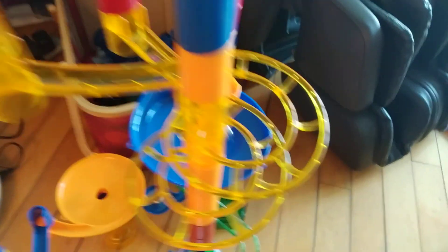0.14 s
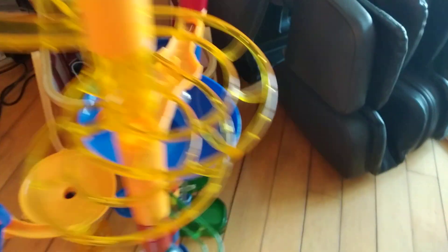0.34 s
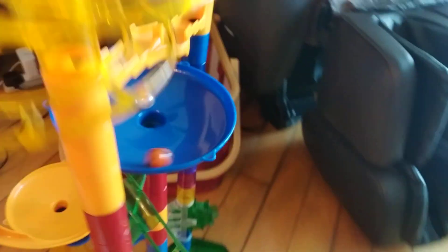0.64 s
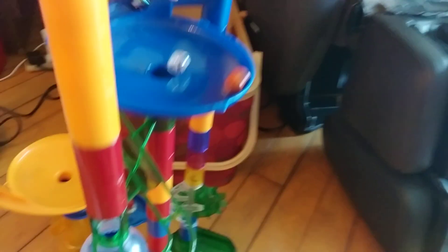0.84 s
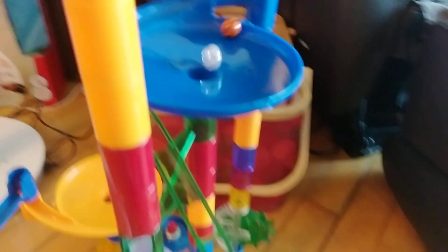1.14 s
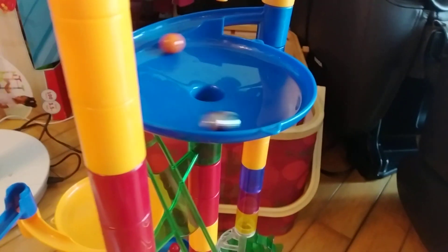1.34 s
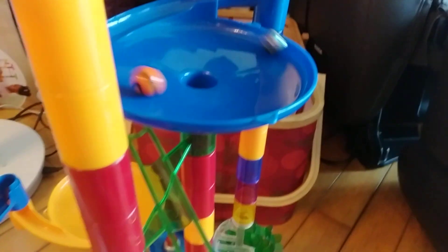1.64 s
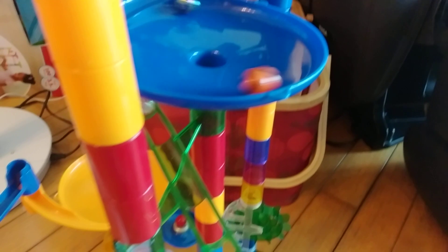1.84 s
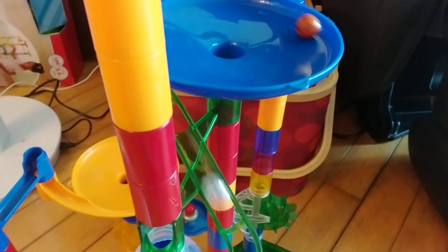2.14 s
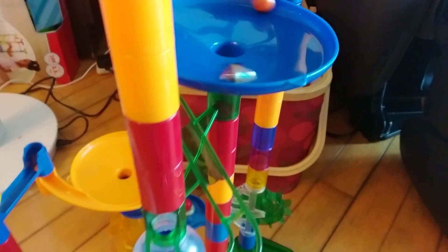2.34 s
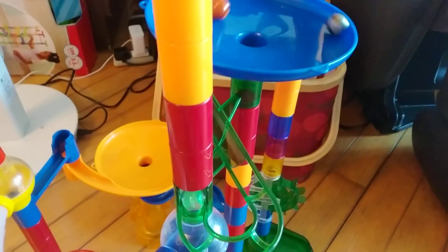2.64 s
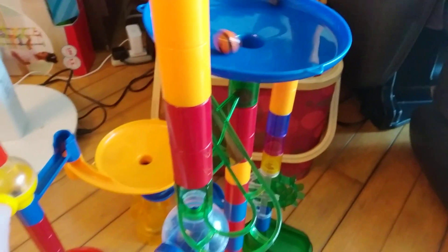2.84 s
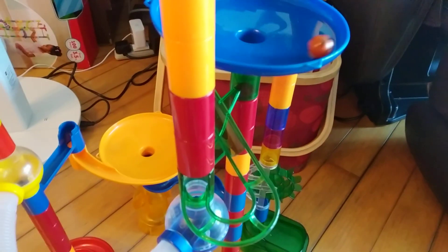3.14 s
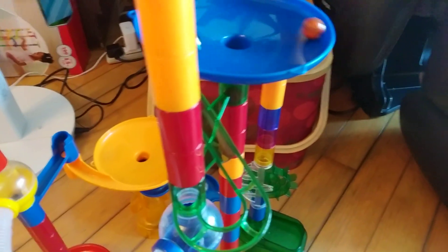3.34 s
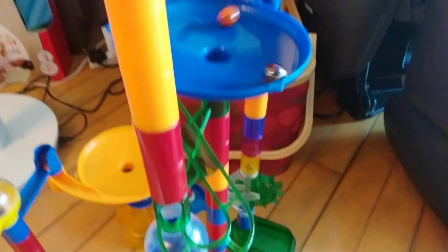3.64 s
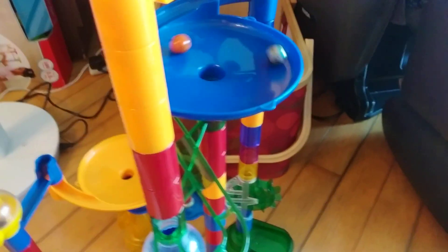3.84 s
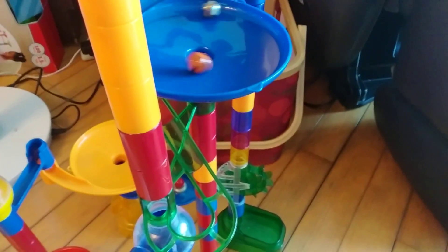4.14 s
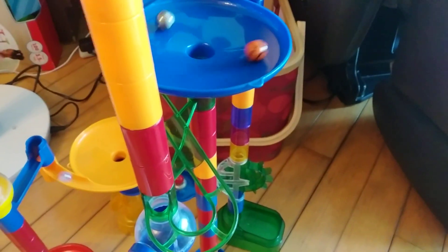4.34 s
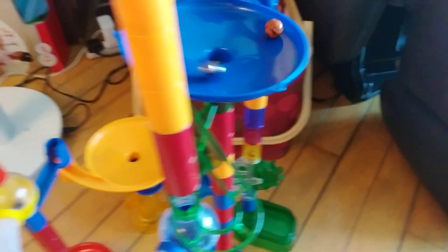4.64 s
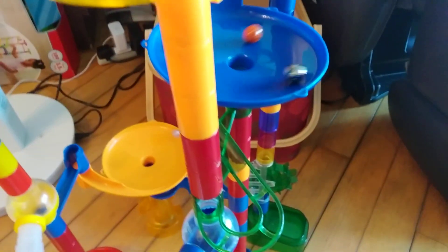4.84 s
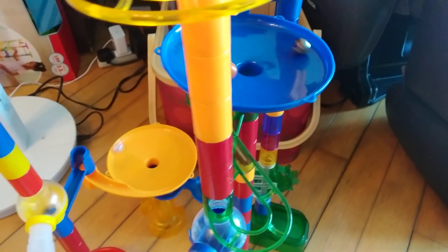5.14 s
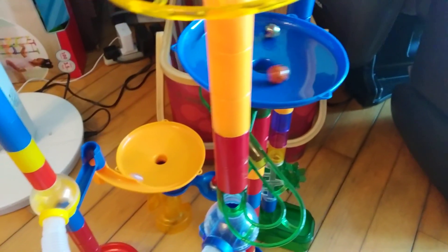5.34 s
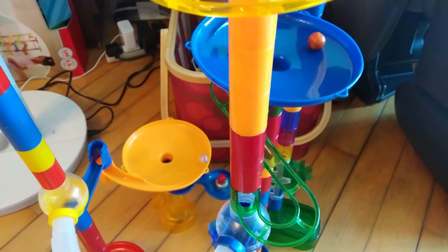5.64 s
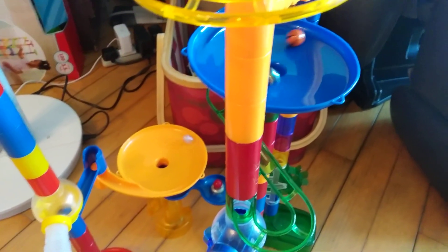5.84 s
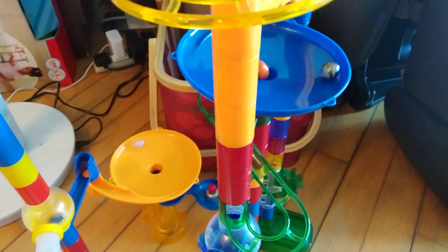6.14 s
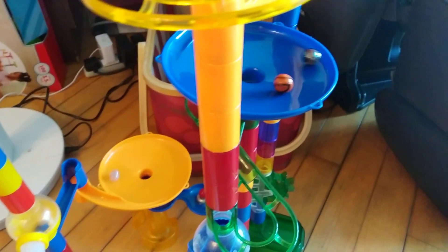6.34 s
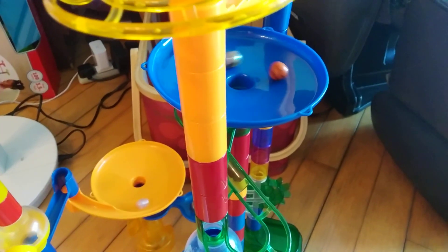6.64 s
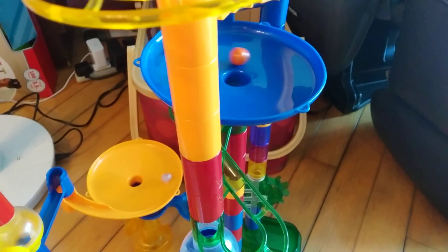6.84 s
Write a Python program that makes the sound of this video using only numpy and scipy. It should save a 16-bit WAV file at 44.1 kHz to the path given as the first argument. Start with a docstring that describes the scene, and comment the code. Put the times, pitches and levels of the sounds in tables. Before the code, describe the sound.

Glass marbles on a plastic track, heard close in a small, slightly live room. From 0 to 0.65 s hard clacks crowd together over rattling tubes. After a brief lull, a marble drops onto a thin rail at 0.9 s, which sings high and rough until about 1.2 s. A tight burst of bright clacks follows at 1.25-1.5 s, then sparse softer knocks to 2 s while marbles roll round the funnels. Flurries of clicks and hollow chute rattle come at 2.3, 2.8 and 3.2-3.5 s. From 3.64 to 4.7 s they grow almost continuous, with a light flap ringing clearly around 3.65 and 4.35-4.45 s. Then the clatter stops: a soft, grainy, wavering roll slowly fades, with faint ticks near 5.05 and 5.7 s, a small cluster of wall bumps at 6.2 s and tiny ticks at 6.8 s, over quiet air and faint low hum.

```python
"""Glass marbles on a plastic track

Glass marbles run through a plastic marble track in a small room, heard by a phone close by.
Blows burst and ring as they clack down joints, strike a light flap and set a thin rail singing.
Rolling is made of crowds of tiny noise bursts: rattling in tubes and chutes, soft round the funnels.
In the end the soft roll is left, with a few faint ticks, over still air and a low mains hum."""
import sys
import numpy as np
from scipy import signal
from scipy.fft import rfft, irfft, next_fast_len
from scipy.io import wavfile
from scipy.ndimage import uniform_filter1d, map_coordinates

SR = 44100
rng = np.random.default_rng(int(sys.argv[2]) if len(sys.argv) > 2 else 0)


def to_wav(s):
    """Save 16-bit WAV."""
    ch = np.atleast_2d(s).T  # columns
    pcm = np.round(np.clip(ch, -1, 1) * 32767)  # PCM
    wavfile.write(sys.argv[1], SR, pcm.astype(np.int16))


N = 308700

# colour of struck plastic: (f/Hz, level/dB)
PLASTIC = [(100, -26), (300, -22), (650, -2.5), (1000, -4), (1500, -4), (2400, 2.5), (3700, -1.5),
           (4700, 3.5), (7300, 1.5), (8300, -10), (10500, -20.5), (16000, -30.5)]
# balance of the towers: (f/Hz, left over right/dB)
TOWER_SIDE = [(100, 3.5), (700, -7), (1300, -6), (2400, 3), (4400, 0.5), (8000, -5.5)]

TOP_HZ = 16300  # nothing is kept above this
TIME = np.arange(N) / SR
AFTER = np.arange(SR // 7) / SR  # seconds since a blow


def amp(db):
    """Turn decibels into a gain."""
    return 10 ** (np.asarray(db) / 20)


def unit(x):
    """Scale to an rms of 1."""
    return x / np.sqrt(np.mean(x ** 2) + 1e-20)


def unit_blow(x, count=400):
    """Scale so that the first samples have an rms of 1."""
    return x / np.sqrt(np.mean(x[..., :count] ** 2) + 1e-20)


def along(points, hz):
    """Read a curve of (f/Hz, value) points at any frequency, on a log axis."""
    f, value = np.transpose(points)
    return np.interp(np.log(hz + 1), np.log(f + 1), value)


def level(rows):
    """Gain at every sample for each dB column that follows the time column."""
    s, *columns = np.transpose(rows)
    return np.array([amp(np.interp(TIME, s, db)) for db in columns])


def wobble(rate):
    """A smooth random curve through `rate` random points a second."""
    knots = rng.standard_normal(int(N * rate / SR) + 4)
    return map_coordinates(knots, [TIME * rate])


def sides(db):
    """Left and right gains that differ by so many dB."""
    pair = amp(np.array([[.5], [-.5]]) * db)
    return pair / np.sqrt(np.mean(pair ** 2, axis=0))


def filtered(x, response):
    """Multiply the spectrum of x by a response of frequency."""
    n = x.shape[-1]
    m = next_fast_len(n + 2048)
    return irfft(rfft(x, m) * response(np.fft.rfftfreq(m, 1 / SR)), m)[..., :n]


def coloured(pair, colour, side):
    """Colour two unrelated signals and spread them over two microphones: alike in the bass, left late."""
    # (f/Hz, likeness of the two microphones from 0 to 1)
    alike = [(100, 0.98), (640, 1), (1400, 1), (3000, 0.31), (7000, 0.018)]
    lag = .00018  # seconds by which the right microphone hears the sound first

    def spread(hz):
        turn = np.arccos(np.clip(along(alike, hz), -1, 1)) / 2
        return amp(colour(hz)) * [np.cos(turn), np.sin(turn)]

    def microphones(hz):
        delay = np.exp(np.pi * 1j * hz * lag * np.array([[-1], [1]]))
        return sides(along(side, hz)) * delay

    mid, diff = filtered(pair, spread)
    return unit(filtered(np.array([mid + diff, mid - diff]), microphones))


def ring(modes, attack):
    """One blow on (f/Hz, width/Hz, level/dB) modes; wider ones die faster, phase and level vary by side."""
    out = 0
    for hz, width, db in modes:
        phase = rng.uniform(0, 2 * np.pi) + rng.normal(0, 1.28, (2, 1))
        gain = amp(db + rng.normal(0, 0.24, (2, 1)))
        out = out + gain * np.sin(2 * np.pi * hz * AFTER + phase) * np.exp(-np.pi * width * AFTER)
    return unit_blow(out * (1 - np.exp(-AFTER / attack)))


def crack(colour, t60, tail_db, tail_t60, count=60):
    """The crowded modes of thin plastic: a fast burst, then the weaker, duller shiver of the joined parts."""
    # each point of contact favours other groups of modes
    groups_db = 3.2 * rng.standard_normal(count)

    def spot(hz):
        return np.interp(hz, np.linspace(0, TOP_HZ, count), groups_db) * np.clip(hz / 2500, 0, 1)

    noise = coloured(rng.standard_normal((2, len(AFTER))), lambda hz: colour(hz) + spot(hz), TOWER_SIDE)
    dull = [(3000, 11.0), (7000, -7.5), (10000, -16.0)]
    shiver = filtered(noise, lambda hz: amp(along(dull, hz)))
    sound = noise * amp(-60 * AFTER / t60) + shiver * amp(tail_db - 60 * AFTER / tail_t60)
    return unit_blow(sound * (1 - np.exp(-(AFTER / 0.001) ** 2)))


def snap(hz, upper_hz, upper_db):
    """The first swing of a struck wall: a few cycles, over in a few milliseconds."""
    crest_s, half_length_s = 0.00139, 0.00057
    t = AFTER - crest_s
    lead = np.array([[.6], [-.6]])  # radians, left first
    swing = np.cos(2 * np.pi * hz * t + lead) + amp(upper_db) * np.cos(2 * np.pi * upper_hz * t + lead)
    return swing / np.hypot(1, amp(upper_db)) * np.exp(-(t / half_length_s) ** 2)


def add(track, s, sound):
    """Mix a sound in at time s."""
    start = max(round(s * SR), 0)
    track[:, start:start + sound.shape[1]] += sound[:, :N - start]


def chatter(rate, spread_db, t60):
    """Tiny contacts of a rolling marble at random times, `rate` a second, each a noise burst that fades."""
    strength = amp(spread_db * np.clip(rng.standard_normal(N), -2, 2))
    contacts = (rng.random(N) < rate / SR) * strength
    power = signal.fftconvolve(contacts ** 2, amp(-120 * AFTER / t60))[:N]
    return unit(np.sqrt(np.abs(power)) * rng.standard_normal((2, N)))


def resonances(modes, hz):
    """Response of (f/Hz, width/Hz, level/dB) modes, which ring only after they are driven."""
    total = 0
    for k, (centre, width, db) in enumerate(modes):
        damping = 1j * hz * width
        total = total + (-1) ** k * amp(db) * damping / (centre * centre - hz * hz + damping)
    return total


def stay(start, length, attack, fade_db_per_s):
    """Loudness curve of a marble's stay on a part: it rises, holds, then dies away."""
    since = TIME - start
    return np.clip(since / attack, 0, 1) * amp(-np.clip(fade_db_per_s * (since - length), 0, 200))


def wall_ring(hz, width_hz, waver, size):
    """A resonance stirred by a rolling marble; its pitch wanders with the point of contact."""
    stir = rng.standard_normal((3, size)) + 1j * rng.standard_normal((3, size))
    # the third noise is shared by both sides
    stir = signal.lfilter(*signal.butter(2, width_hz / SR), stir[:2] + 1.44 * stir[2])
    pitch = hz * (1 + waver * wobble(12)[:size])
    return unit(np.real(stir * np.exp(2j * np.pi * np.cumsum(pitch) / SR)))


def background():
    """Still air as coloured noise, and the hum of an appliance as gently wavering sines."""
    # colour of the quiet room: (f/Hz, level/dB)
    air_colour = [(25, -22), (65, -30), (100, -1.5), (140, -5.5), (300, -6.5), (700, -5.5), (2000, -34),
                  (7000, -16.5), (9000, -42.5), (16000, -54)]
    # mains hum before its final gain: (f/Hz, level/dB)
    hum_tones = [(100.4, -68), (200.1, -73)]
    air = coloured(rng.standard_normal((2, N)), lambda hz: along(air_colour, hz), [(100, 3.1), (2000, 1)])
    hum = 0
    for hz, db in hum_tones:
        loudness = amp(db + 3 * wobble(9)) * np.sqrt(2)
        hum = hum + loudness * np.sin(2 * np.pi * hz * TIME + .5 * wobble(9))
    return amp(-63.0) * air + amp(3.0) * sides(4.9) * hum


def room(x, count=4):
    """Echoes as fading noise: random tails take turns every 2048 samples, so the echoes keep varying."""
    # time to die by 60 dB: (f/Hz, t60/s)
    decay = [(200, 1), (1500, 0.072), (6000, 0.24), (12000, 0.09)]
    out = np.zeros((2, N))
    turn = (np.arange(N) // 2048) % count
    for k in range(count):
        hz, t, z = signal.stft(rng.standard_normal((2, SR // 2)), SR, nperseg=256)
        fade = amp(-60 * t / along(decay, hz)[:, None])
        tail = signal.istft(z * fade, SR, nperseg=256)[1]
        tail *= 1 - np.exp(-(np.arange(tail.shape[1]) / SR / 0.0028) ** 2)
        share = uniform_filter1d(1.0 * (turn == k), size=128)
        out += signal.fftconvolve(x * share, tail / np.linalg.norm(tail[0]), axes=1)[:, :N]
    return out


def thumps():
    """A heavy landing shoves a whole tower: a low sine that dies within a few cycles."""
    # dull thumps: (t/s, level/dB, f/Hz)
    landings = [(1.1784, -39.5, 285), (1.186, -44, 129), (1.357, -35.5, 420), (3.379, -56, 163),
                (4.198, -48, 526)]
    out = np.zeros((2, N))
    for s, db, hz in landings:
        shove = np.sin(2 * np.pi * hz * AFTER) * np.exp(-.9 * hz * AFTER)
        add(out, s, amp(db) * sides(3.5) * unit_blow(shove))
    return out


def funnels():
    """Marbles circle with a soft grainy roll and a wavering drone, tick over flaws and bump the wall."""
    # colour of the rolling: (f/Hz, level/dB)
    roll_colour = [(59, -40), (100, -7), (126, -14), (189, -8), (234, -33), (328, -2.5), (365, -22),
                   (558, 1), (991, -9), (1420, 1.5), (1910, -6.5), (2270, 1.5), (3780, -22), (7140, -19),
                   (16000, -126.5)]
    # balance: (f/Hz, left over right/dB)
    balance = [(100, 4.6), (700, 0.69), (1300, 1.1), (2400, 13.8), (4400, 4.9), (8000, 1)]
    # strength of the rolling, mostly sinking as the marbles slow down: (t/s, level/dB)
    strength = [(0, -39.5), (1.7, -43.5), (2.1, -47), (3.1, -50), (4.85, -45), (5.3, -48.5), (5.8, -52.5),
                (7, -54)]
    # a marble sweeps past the near side: (t/s, ring of the wall there f/Hz, ring before strength/dB)
    passes = [(1.769, 1370, -7), (1.92, 1980, -20), (2.709, 2150, 4.5), (5.06, 1384, -6), (5.32, 2230, -14),
              (5.459, 2226, -1), (5.56, 2134, -5), (5.872, 1256, -2.5), (5.989, 2024, -8),
              (6.139, 2406, -0.5), (6.21, 1593, -0.5), (6.692, 1700, -0.5), (6.827, 1425, -1),
              (6.96, 2270, -2.5)]
    # marbles bumping the wall: (t/s, level/dB)
    bumps = [(1.858, -53), (5.042, -44), (5.328, -51), (5.452, -50), (5.988, -54), (6.13, -48),
             (6.168, -43.5), (6.199, -35), (6.213, -36.5), (6.225, -40.5), (6.263, -46)]
    # modes of the funnel's shell: (f/Hz, width/Hz, level/dB)
    shell = [(1185, 160, 4.5), (1500, 94, 2), (1650, 44, 3), (2150, 220, 3), (2520, 300, 16)]
    pass_s = 0.04  # half the length of a swell
    pitch_waver = .02  # share by which the wall's pitch wanders
    bump_scatter = 0.03  # share by which the shell's modes differ from spot to spot

    roll = coloured(chatter(rate=2500, spread_db=.5, t60=0.06), lambda hz: along(roll_colour, hz), balance)
    grit = chatter(rate=400, spread_db=3, t60=.1)
    bright = [(1000, -1.5), (5000, 29.5), (9000, -48.0)]
    ticks = coloured(grit, lambda hz: along(roll_colour, hz) + along(bright, hz), balance)
    drone = sides(3.9) * wall_ring(1415, width_hz=175, waver=.06, size=N)
    unevenness = amp(1.4 * wobble(16))
    out = unevenness * amp(-2.5) * roll + amp(-11) * drone + amp(-8.0) * ticks
    for s, ring_hz, ring_db in passes:
        near = np.exp(-((TIME - s) / pass_s) ** 2)
        on = near > .001
        narrow = wall_ring(ring_hz, 240, pitch_waver, size=on.sum())
        broad = wall_ring(ring_hz, 2000, pitch_waver, size=on.sum())
        wall = narrow + amp(-3.5) * broad
        out[:, on] += amp(ring_db) * near[on] * sides(along(balance, ring_hz)) * wall
    out *= level(strength)
    for s, db in bumps:
        spot = []
        for hz, width, mode_db in shell:
            spot.append((hz * (1 + bump_scatter * rng.standard_normal()), width, mode_db))
        add(out, s, amp(db) * sides(21) * ring(spot, attack=0.0047))
    return out


def tubes():
    """Marbles skitter down tubes and chutes: a noisy rattle, with a hollow boom and a ring of the wall."""
    # colour of the rattle: (f/Hz, level/dB)
    tube_colour = [(60, -25.5), (100, -22), (200, -21), (320, -12.5), (420, -12.5), (650, -2.5),
                   (1050, -6.5), (1450, 3), (1900, 1), (2600, 4.5), (3700, -4), (4600, -4), (7200, -8),
                   (8500, -25.5), (14000, -39.5), (16000, -44)]
    # runs: (t/s, length/s, level/dB, brightness/dB, hollow boom f/Hz, boom/dB,
    #        wall ring f/Hz, ring/dB, left over right/dB)
    runs = [(-0.04, 0.033, -19, 0, 710, -52, 2690, -20, 3),
            (0.041, 0.088, -30, 0, 600, -31, 2600, -25, 5.5),
            (0.169, 0.055, -36.5, -20, 705, -8, 2330, -16, 5),
            (0.242, 0.091, -28, -1, 650, -30, 2650, -10.5, 3.5),
            (0.349, 0.18, -27.5, 8.5, 653, -24, 2824, -7.5, -0.5),
            (0.487, 0.16, -29.5, -4.5, 653, -17, 2640, -8, 5.5),
            (0.782, 0.069, -34, -5.5, 1040, -10, 2176, -29, 9.5),
            (1.255, 0.096, -33, 9, 1150, -7, 2880, -5, 2),
            (1.317, 0.15, -35.5, 4, 1140, -18, 4650, 0.5, 11),
            (1.331, 0.093, -33.5, 7, 1320, -21, 1505, 4, -10),
            (1.492, 0.053, -40, -1, 600, -32, 1500, -12, 12),
            (2.238, 0.03, -43, 18, 596, -14, 2250, -20, 7),
            (2.301, 0.082, -30.5, 2, 318, -19.5, 5160, -13, 1.5),
            (2.805, 0.11, -26, 1.5, 340, -20.5, 3150, -14.5, 0),
            (3.169, 0.027, -28, 0, 550, -15, 2280, -5, 1),
            (3.248, 0.22, -26, 2, 360, -25, 1468, -10.5, -1.5),
            (3.647, 0.03, -26, -0.5, 826, -20, 2280, -23.5, -0.5),
            (3.723, 0.16, -32, -11, 850, -12, 2255, -14.5, 0.5),
            (3.895, 0.11, -26.5, 3.5, 350, -27, 2270, -8, 0.5),
            (4.056, 0.031, -39.5, -13, 704, -14, 2470, -1, 11),
            (4.189, 0.087, -28, 1, 540, -19.5, 1480, -11.5, 2),
            (4.349, 0.032, -40, -8, 708, -3, 2280, 0, 7),
            (4.574, 0.15, -28, 0.5, 676, -11.5, 2180, -24, 4.5)]
    # the rattle builds as the marble gathers speed and dies once it has left
    attack_s, fade_db_per_s = 0.025, 238.5
    boom_q = 3.6  # sharpness of the hollow resonance

    grains = chatter(rate=950, spread_db=2.8, t60=.02)
    # narrow bands of the rattle swell and fade at random
    z = signal.stft(grains, nperseg=1024)[2]
    patches = uniform_filter1d(rng.standard_normal(z.shape[1:]), 3, 0)
    patches = uniform_filter1d(patches, 8, 1)
    grains = signal.istft(z * amp(3.2 * unit(patches)), nperseg=1024)[1][:, :N]
    rattle = coloured(grains, lambda hz: along(tube_colour, hz), TOWER_SIDE)
    treble = filtered(rattle, lambda hz: 1 / (1 + (3300 / (hz + 1)) ** 6))
    bass = filtered(rattle, lambda hz: 1 / (1 + (hz / 1200) ** 6))
    out = np.zeros((2, N))
    for s, length, db, bright_db, boom_hz, boom_db, ring_hz, ring_db, pan_db in runs:
        inside = stay(s, length, attack_s, fade_db_per_s)
        on = inside > .001
        boom = unit(signal.lfilter(*signal.iirpeak(boom_hz, boom_q, SR), bass[:, on]))
        tube = unit(rattle[:, on] + (amp(bright_db) - 1) * treble[:, on]) + amp(boom_db) * boom
        wall = amp(ring_db) * wall_ring(ring_hz, width_hz=260, waver=.02, size=on.sum())
        out[:, on] += amp(db) * sides(pan_db) * inside[on] * (tube + wall)
    return out


def rail():
    """A marble drops on a thin rail and keeps it singing roughly; as it runs along, modes swell and fade."""
    # modes, each driven hardest where the marble passes its belly (the place where it swings widest):
    # (f/Hz, width/Hz, level/dB, swell/dB, swell t/s, half length of the swell/s)
    rail_modes = [(2270, 62, -27.5, 6, 1.18, 0.1), (2410, 97, -38.5, 11, 0.96, .05),
                  (2770, 42, -34.5, 14, 0.963, 0.026), (2900, 160, -42.5, 21.5, 0.892, 0.075),
                  (3340, 30, -44.5, 5, 1.2, 0.03), (4400, 68, -44, 4, 0.96, 0.063),
                  (5520, 38, -43, 12, 0.9, 0.045), (7530, 70, -50.5, 8, .94, 0.07),
                  (8340, 210, -52, 13, 1.04, 0.067)]
    # jolts: (t/s, level/dB, mode that rings most f/Hz, its width/Hz, snap/dB)
    jolts = [(0.9162, -23, 2740, 30, 15), (.917, -30, 3340, 18, -10), (0.918, -30.5, 7530, 70, -8.5),
             (0.918, -36, 5520, 22, -8), (1.03, -23, 5525, 26, -4), (1.033, -32, 3340, 36, -10),
             (1.04, -21, 3340, 12, 4), (1.0695, -27.5, 4390, 40, -3), (1.126, -32, 4412, 27, -4.5)]
    start_s, length_s = .915, 0.26  # landing on the rail, and time spent there
    attack_s, fade_db_per_s = 0.0042, 488.5
    shimmer_db, scrape_db = -30.5, -34.5  # fine bouncing heard through the modes, and as a dry scrape
    stir_db = -2  # the part of each mode that the bouncing keeps knocking out of step
    flutter_db, flutter_per_s = 2.6, 130

    riding = stay(start_s, length_s, attack_s, fade_db_per_s)
    on = riding > .001
    t = TIME[on]
    modes = [(hz, width, db) for hz, width, db, *_ in rail_modes]
    bouncing = chatter(rate=850, spread_db=5.0, t60=0.012)
    shimmer = unit(filtered(bouncing, lambda hz: resonances(modes, hz)))
    scrape = chatter(rate=900, spread_db=2.5, t60=0.022)
    scrape = coloured(scrape, lambda hz: along(PLASTIC, hz), TOWER_SIDE)
    # the scrape has a slower fade of its own, under the fade of the whole ride
    out = amp(shimmer_db) * shimmer + amp(scrape_db) * scrape * stay(start_s, 0.28, attack_s, 130)
    for hz, width, db, swell_db, swell_at, swell_s in rail_modes:
        stirred = wall_ring(hz, 2 * width, 0.0017, size=len(t))
        steady = np.sqrt(2) * np.sin(2 * np.pi * hz * t + rng.normal(0, 0.99, (2, 1)))
        flutter = amp(flutter_db * wobble(flutter_per_s)[on])
        belly = np.exp(-((t - swell_at) / swell_s) ** 2)
        singing = unit(flutter * (steady + amp(stir_db) * stirred))
        out[:, on] += sides(8.0) * amp(db + swell_db * belly) * singing
    out *= riding
    tick_tilt = [(900, -21.0), (2200, 8.0)]
    for s, db, main_hz, width, snap_db in jolts:
        main = unit_blow(np.sin(2 * np.pi * main_hz * AFTER) * np.exp(-np.pi * width * AFTER))
        tone = main + amp(0.5) * ring(modes, attack=0.00032)
        tick = crack(lambda hz: along(PLASTIC, hz) + along(tick_tilt, hz),
                     t60=0.011, tail_db=-42.0, tail_t60=0.14)
        swing = snap(main_hz, rail_modes[4][0], upper_db=-7.5)
        add(out, s, amp(db) * (tone + amp(-4.5) * tick + amp(snap_db) * swing))
    return out


def flap():
    """A light flap rings on a few clear modes; two high ones depend on the blow and where it lands."""
    # strikes and bounces: (t/s, level/dB, brightness/dB, high mode f/Hz, top mode f/Hz)
    strikes = [(3.6382, -18.5, 3, 5300, 5830), (3.6644, -23.5, 14, 5600, 6170),
               (3.7356, -17.5, 10, 5450, 6260), (4.341, -19, 17, 4650, 7170), (4.361, -37, -9, 5000, 7130),
               (4.4271, -18, 16, 4950, 7150), (4.452, -26, -12, 5000, 7060), (4.4679, -30, -7, 5030, 7130)]
    # modes of the flap: (f/Hz, width/Hz, level/dB)
    flap_modes = [(794, 37, -13.5), (1510, 39, -5.5), (2268, 109, 14), (2190, 160, 4), (3030, 200, -3.5),
                  (7530, 186, 5)]
    balance = [(2300, 4.5), (7000, -7.0)]
    out = np.zeros((2, N))
    for s, db, bright_db, high_hz, top_hz in strikes:
        modes = flap_modes + [(high_hz, 260, bright_db - 5), (top_hz, 280, bright_db + 5.0)]
        tone = filtered(ring(modes, attack=0.0082), lambda hz: sides(along(balance, hz)))
        burst = crack(lambda hz: along(PLASTIC, hz), t60=.026, tail_db=-17, tail_t60=.12)
        add(out, s, amp(db) * (tone + amp(-4.5) * burst))
    return out


def clacks():
    """Glass on plastic: a snap, a crack coloured by the blow, the ring of the struck spot and its tower."""
    # hits: (t/s, level/dB, brightness/dB, lower ring f/Hz, upper ring f/Hz,
    #        upper over lower/dB, left over right/dB)
    hits = [(0.035, -20, -8, 2600, 3800, -6, 10), (0.0641, -25.5, -8, 1910, 4130, -3, 7),
            (0.0833, -19.5, 5, 3370, 7260, 7, -14.5), (0.094, -29.5, -15, 1460, 5350, -1, 2.5),
            (0.1193, -30.5, 1, 2460, 7000, 7, 5), (0.1896, -17.5, 4, 2440, 7120, -1, 0.5),
            (0.2063, -29.0, -3, 2310, 7140, 11, 5), (0.266, -17.5, 8.5, 2640, 3930, -6.5, 2.5),
            (0.2754, -18.5, -8, 1810, 6880, 14, -20), (0.3025, -24.5, 0, 2200, 7070, -3, 3),
            (0.317, -24.5, 0, 2000, 7140, 14, -5), (0.354, -17, 1.5, 3440, 4460, 0, 9),
            (0.376, -23, 8, 1830, 4660, 9, -12), (0.383, -23.5, 16, 1510, 4580, 13, -9),
            (0.404, -14, 3.5, 2850, 7060, -4, 12), (0.4109, -17.5, -6, 2640, 7380, -2, 1),
            (0.4485, -25, -10, 3230, 6000, 2, 11), (0.4548, -17.5, 3, 3030, 4430, 17, -9),
            (0.461, -17, 4, 3040, 3970, -9, 3), (0.47, -18.5, 3, 2150, 5630, -4, -1),
            (0.5234, -18.5, 6, 2050, 4370, 0, 16), (0.5333, -20, -16, 2050, 6000, -5, -18),
            (0.5402, -27, -13, 1740, 4100, -2, -10), (0.5806, -19.5, -20, 2040, 4110, -7, 1),
            (0.6143, -25, -13, 1970, 4160, -15, -5), (0.64, -32, -13, 2390, 4090, -8, 14),
            (0.8062, -28.5, 7.5, 2640, 4320, 13, -1), (1.2404, -18, 5.5, 1860, 5520, -2, 4),
            (1.249, -17, -5, 3340, 4500, -5, 3), (1.2591, -17.5, 1, 2100, 5380, 5, 0),
            (1.2685, -26, 5, 1630, 6070, -8, -3), (1.284, -22.5, 3, 1780, 4640, -11, -7),
            (1.3137, -15.5, 2, 2600, 4200, 17, 7), (1.3228, -15.5, -6, 2830, 4900, -12, -1.0),
            (1.331, -19.5, 0, 2870, 3960, -14, 1.0), (1.342, -23, 10, 3120, 4770, 25, -6),
            (1.352, -16.5, 13.5, 3190, 4490, 16, -6), (1.356, -14.5, -3.5, 2810, 4570, 0, 11.5),
            (1.3698, -33, 3, 1350, 4660, -6, -3), (1.3978, -22, 2.5, 3300, 4570, 19, -4),
            (1.408, -25.5, -1, 1660, 4750, 11, 10), (1.4629, -18, 10, 3560, 5270, 24, 1.5),
            (1.614, -27.5, -8, 2520, 4560, 23, 5.5), (1.869, -39.5, -25, 2440, 4320, -15, 21),
            (1.9613, -32.5, -3, 1600, 4320, 2, 5), (1.9805, -25, -9, 1280, 4570, 5, 11.5),
            (2.2838, -22, 1.5, 2200, 4050, 6, 3), (2.2918, -23, -7, 2160, 3820, 1, -2),
            (2.3019, -19.0, 0, 1650, 4130, 1, 4), (2.327, -19.5, 6.5, 3400, 4700, 5, 2),
            (2.3448, -25, 0, 1370, 5040, 22, 2.5), (2.3894, -25, 6, 3140, 6450, 1, -11),
            (2.4068, -23.5, -3, 3230, 5310, 17, -10), (2.427, -31, -13, 2200, 4800, 6, 9),
            (2.7524, -22, -3.5, 2270, 5700, -5.5, 7), (2.7985, -16, 0.5, 2600, 4700, 7, 8.5),
            (2.816, -20, 14, 2260, 4650, 11, -16), (2.8302, -19.5, 9, 3130, 6360, -31, 14),
            (2.839, -17.5, 3, 3150, 3970, 8, 7), (2.861, -23, 1, 2270, 3830, -1, 7),
            (3.1595, -19.0, -5, 2490, 3740, -15, 9), (3.1862, -19, -2, 2564, 5100, -9, 2.5),
            (3.206, -22.0, -1, 2110, 3660, 2, -10), (3.2527, -15.5, -0.5, 2450, 4400, 2, 4.5),
            (3.2696, -21.5, -2, 1610, 7300, -2, 1), (3.353, -24.5, -1, 1750, 4950, -10, -14.0),
            (3.374, -15.5, -2.5, 2355, 4330, -1, 1.0), (3.3859, -24.5, 8, 2130, 4680, -1, -26),
            (3.423, -26, 4, 2330, 3800, -12, 6), (3.455, -20, 0, 2240, 6500, -13, -15),
            (3.4645, -23.0, -8.0, 1890, 5740, -8, 1), (3.7899, -18.5, 11.5, 2980, 4420, -12, 5.0),
            (3.822, -15, -3.0, 2320, 6710, -3, -6), (3.856, -17, -6, 2650, 4120, -13, -3),
            (3.8603, -28, -29, 2260, 3950, -15, 9), (3.8832, -16, 3, 2230, 6210, -5, 19),
            (3.8882, -17, 12, 2450, 6040, 1, -1), (3.906, -18.5, 11.5, 2210, 4060, -11, -10),
            (3.932, -18.5, 6, 2220, 4820, 14, 5), (3.954, -18.0, 9, 2600, 4730, -19, -1),
            (4.1233, -14, -3.5, 2490, 6800, -4, 0), (4.149, -16.5, -1, 3400, 5500, 4, 18),
            (4.162, -15, 1, 2540, 6130, -5, -4), (4.1857, -15.5, -3, 2660, 5420, 18, 2.5),
            (4.244, -15, -1.5, 3430, 4770, 19, -0.5), (4.267, -24, -8.5, 2180, 4840, -5, 12),
            (4.5035, -17, -15, 3470, 4460, -7, -1), (4.5486, -15.5, -4.5, 3360, 7050, -1, 3.5),
            (4.5752, -23.5, -3, 2160, 4120, 7, -1), (4.603, -15.5, 0.5, 3720, 4080, -1, 11),
            (4.618, -24.0, 1, 2230, 5590, -8, 0), (4.632, -19.0, 7, 2860, 4630, -9, 3),
            (4.6687, -14.5, -1, 3330, 4660, -3, 6), (4.6734, -18, -3.5, 3320, 4550, 29, -9),
            (5.138, -42.5, -8, 2230, 4690, -4, 10), (5.699, -36.5, 0, 1480, 5460, 2, 5.5),
            (5.721, -39.5, -14.5, 2530, 6200, -13, 7), (5.742, -46.0, -15.5, 2280, 4540, -17, 8),
            (6.819, -41, -4, 1400, 6000, 2, 8), (6.828, -44, -7, 2560, 5900, 0, 18)]
    # the part of the track being struck: (from t/s, hollow knock/dB)
    parts = [(0, -8), (0.33, -8), (0.48, -13), (1.1, -11), (1.3, -30), (1.75, 5), (2.15, -3.5),
             (3.05, -5.5), (3.6, -21), (3.92, 5.5), (4.05, -13.5), (4.22, -8), (4.58, -8), (4.9, 2.5)]
    # modes of the stacked towers, shaken by every blow: (f/Hz, width/Hz, level/dB)
    tower_modes = [(112, 6.4, -23), (309.6, 17.5, -7.5), (595, 12, -12.5), (840, 7.8, -6), (1342, 43, 14),
                   (1510, 44, 14.5), (1660, 16.4, 5.5)]
    # above this level each extra dB of a blow adds this many dB of top treble
    hard_blow_db, hard_treble = -18, 1

    out = np.zeros((2, N))
    for s, db, bright_db, lower_hz, upper_hz, upper_db, pan_db in hits:
        _, knock_db = parts[sum(s >= later[0] for later in parts[1:])]
        # a harder blow is a shorter contact, so it reaches higher
        hardness_db = hard_treble * max(db - hard_blow_db, 0)
        tilt = [(800, knock_db), (1500, 0), (2900, 0),
                (4300, bright_db), (8000, bright_db), (11000, bright_db + hardness_db)]
        burst = crack(lambda hz: along(PLASTIC, hz) + along(tilt, hz), t60=.026, tail_db=-18.5, tail_t60=.14)
        # the strongest resonances are close pairs: one mode radiates fast, the other lingers
        modes = [(lower_hz, 200, 0), (lower_hz * 1.02, 50, -16),
                 (upper_hz, 220, upper_db), (upper_hz * 1.012, 50, upper_db - 15)]
        spot = ring(modes, attack=0.0021)
        tower = ring(tower_modes, attack=0.0084)[0] * sides(-1.3)
        swing = snap(lower_hz, upper_hz, upper_db)
        blow = unit_blow(burst + amp(-2.5) * spot + amp(4.5) * swing)
        add(out, s, amp(db) * (sides(pan_db) * blow + amp(-21.5) * tower))
    return out


def scene():
    """The whole track; the blows also sound through the room."""
    blows = clacks() + flap() + rail() + thumps()
    return blows + amp(-14.5) * room(blows) + tubes() + funnels() + background()


def record(dry):
    """The phone rounds off the highest peaks, thins the deep bass and keeps nothing above its band limit."""
    soft = dry / (1 + np.abs(dry / .9) ** 6) ** (1 / 6)
    return filtered(soft, lambda hz: (hz < TOP_HZ) * hz / np.hypot(hz, 55))


dry = scene()
out = record(dry)
to_wav(out)
```